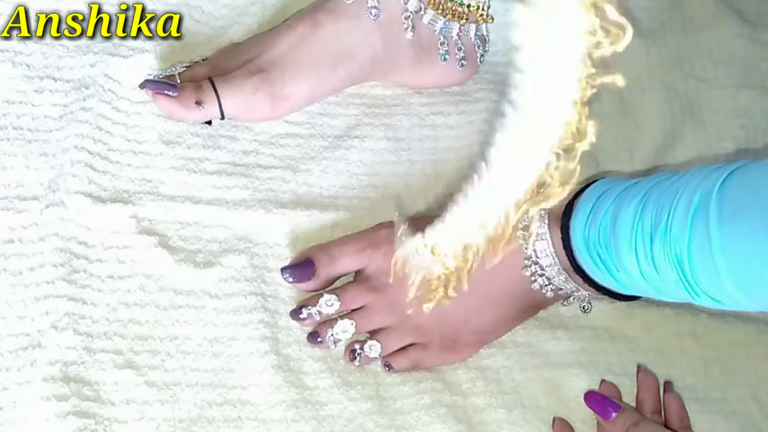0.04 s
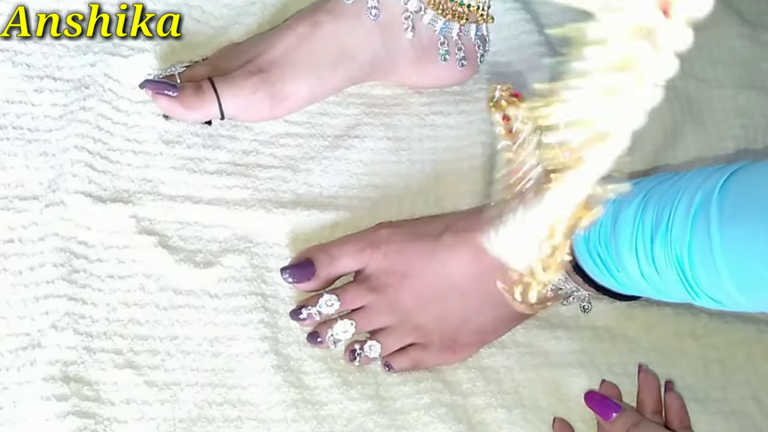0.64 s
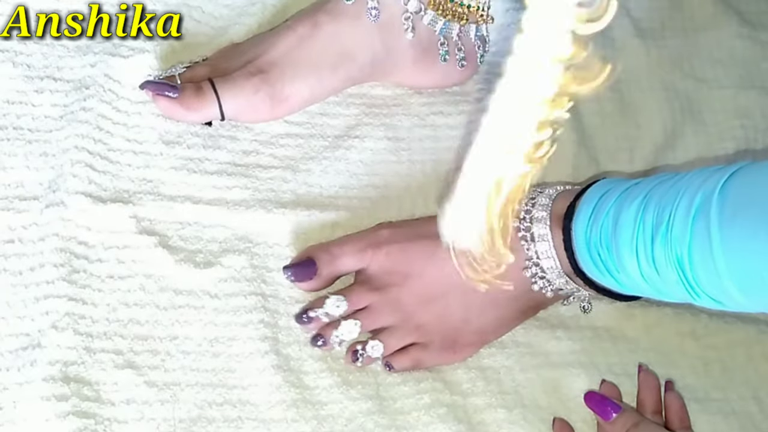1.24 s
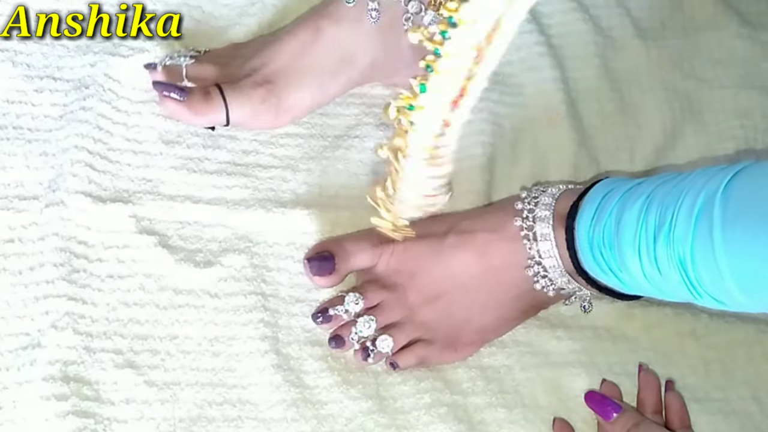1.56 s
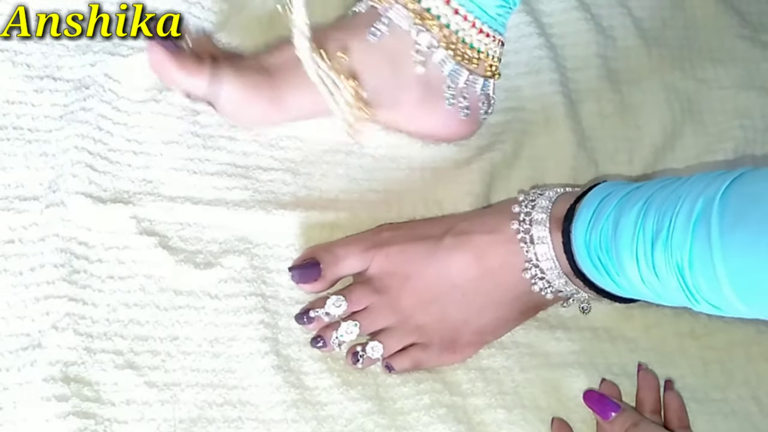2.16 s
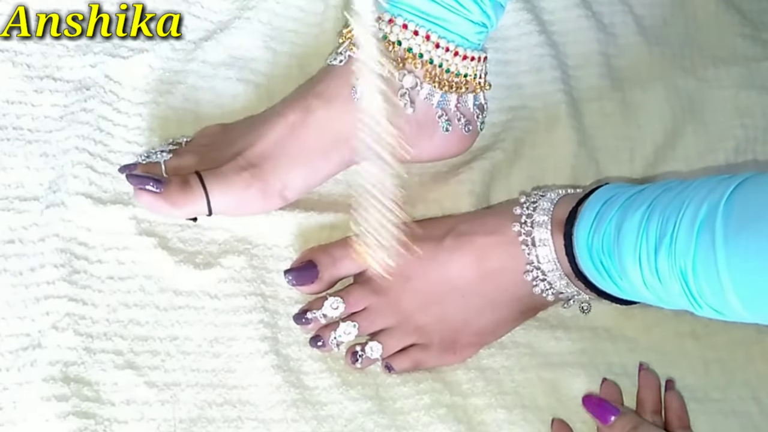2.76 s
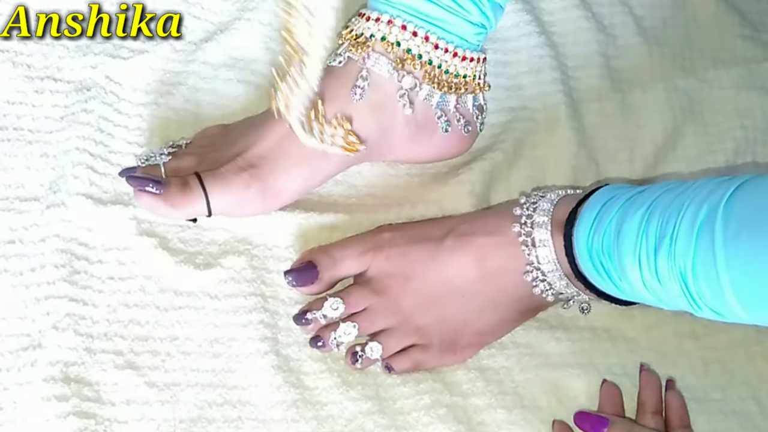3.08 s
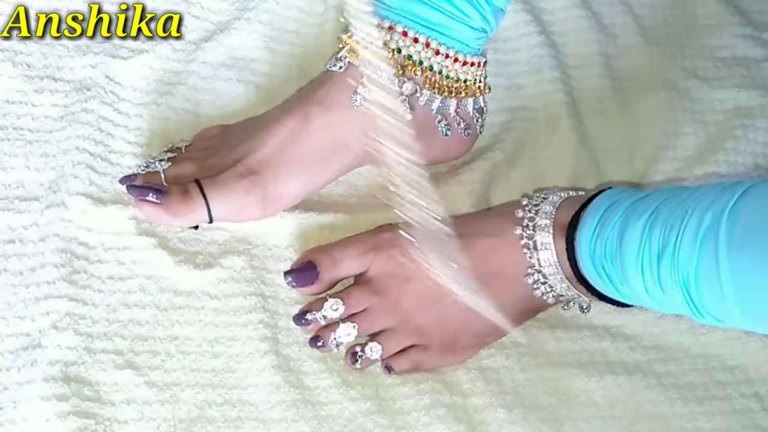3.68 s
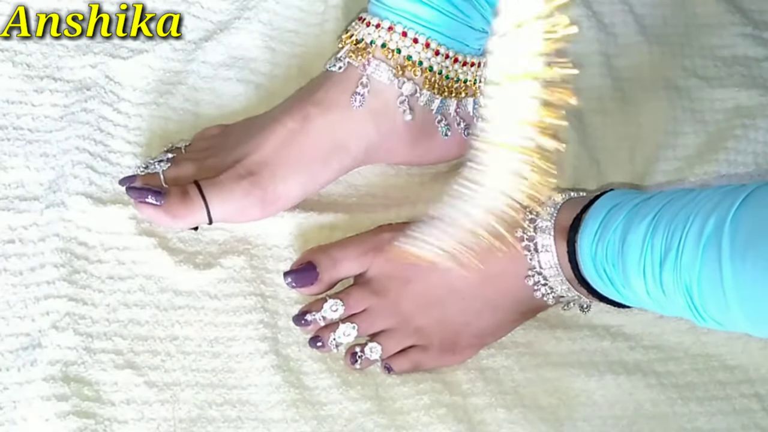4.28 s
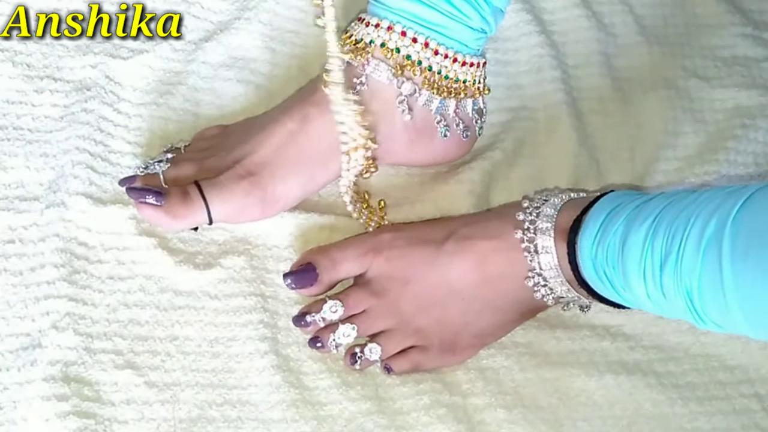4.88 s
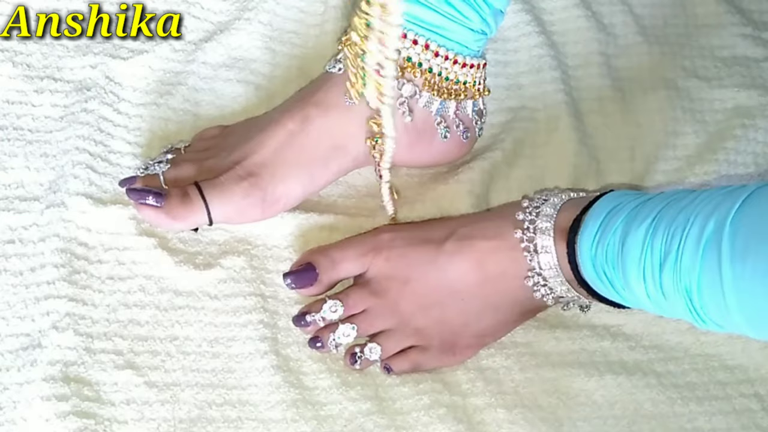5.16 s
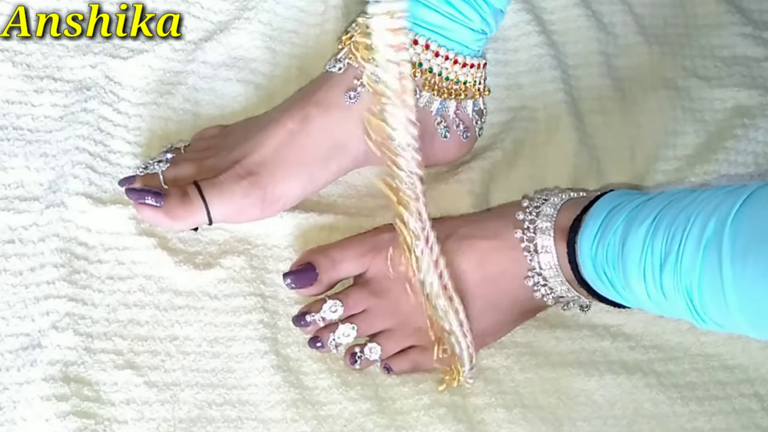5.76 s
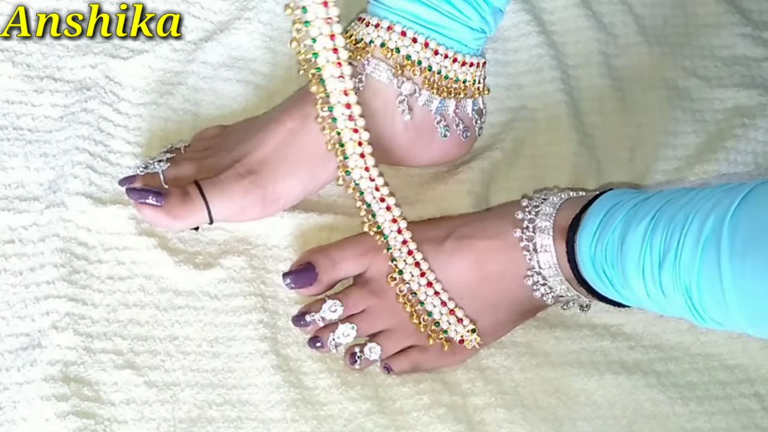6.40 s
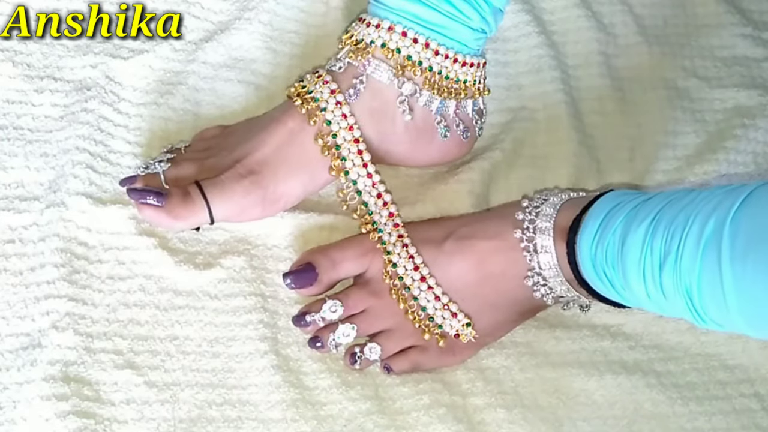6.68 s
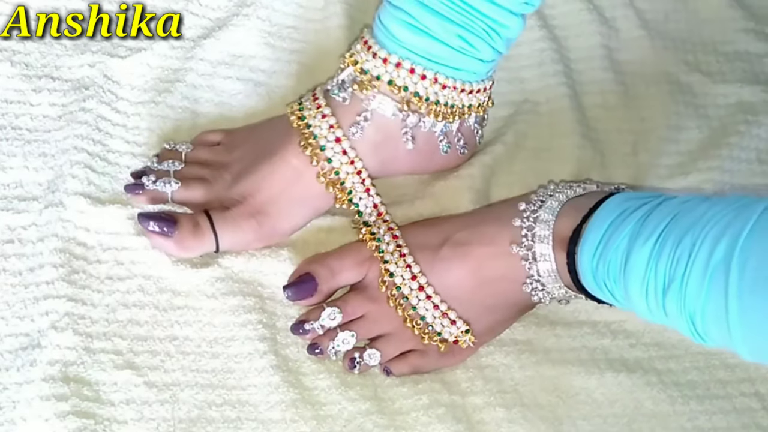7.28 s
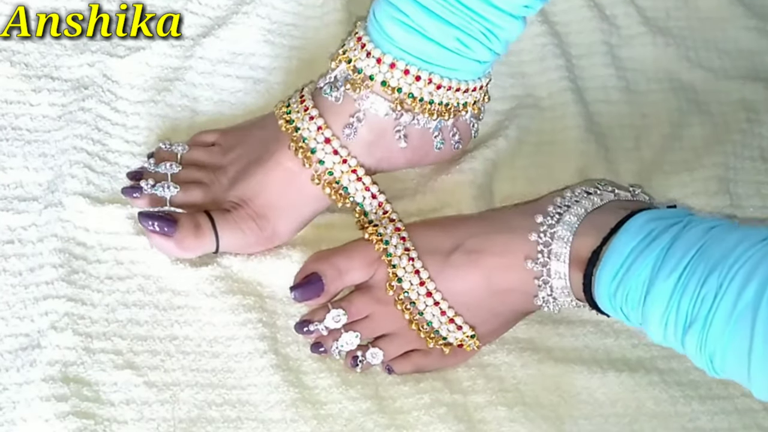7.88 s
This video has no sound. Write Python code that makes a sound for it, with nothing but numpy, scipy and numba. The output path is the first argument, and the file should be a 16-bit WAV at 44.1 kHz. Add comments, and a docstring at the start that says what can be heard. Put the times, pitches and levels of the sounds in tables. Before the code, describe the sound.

Tiny anklet bells jingle close to the microphone, lightly at first and then in stronger, irregular bursts. Chain links crunch and click within the thin, high shimmer, while the bedding gives soft, low thuds. Past the middle the shaking turns fast and regular twice, before fading to a final short jingle. A steady rush of air and a low hum fill the small bedroom throughout.

```python
"""An anklet fringed with tiny bells is swung over a bed, close to a phone in a small, humming room.
First come light shakes: the bells knock together and ring very high, and silver pendants chink faintly.
From 1.5 s the swings grow stronger, with dry clicks; chain links crunch and the bedding thuds softly.
Even shaking follows at 4.4 s and, harder, at 5.9 s. After 7 s it dies down, with a last bright clash,
as the anklet is laid across the feet. All along, the phone turns itself down when the jingling is loud."""
import sys
import numpy as np
from scipy import signal
from scipy.fft import rfft, irfft, next_fast_len
from scipy.io import wavfile
from scipy.ndimage import uniform_filter1d
from numba import njit

SR = 44100
rng = np.random.default_rng(int(sys.argv[2]) if len(sys.argv) > 2 else 0)


def unload_audio(sound):
    """Save the sound as a 16-bit wav file, at the path given as the first command line argument."""
    columns = np.transpose(np.atleast_2d(sound))
    # keep every value between -1 and 1, then stretch to whole-number steps
    steps = np.round(np.clip(columns, -1, 1) * 32767)
    wavfile.write(sys.argv[1], SR, steps.astype(np.int16))


N = 358974
TIME = np.arange(N) / SR

# the tone of metal scraping on metal: f/Hz, relative level/dB
SCRAPE_TONE = [(1500, -7), (3500, -1), (4300, 1), (4660, 7), (5100, 1), (6000, 9), (6600, 10.5), (7400, 7),
               (8500, 2.5), (10000, 4.5), (11500, 14.5), (13000, 20.5), (15500, -11)]
def jingle(bells, shake_db, count=4200, hits=3, scrape_s=0.008, scrape_db=-31, boost_db=2):
    """Bells bump at random, more often when shaken harder; each bump bounces on through a few bells."""
    scatter_db, bounce_s, rebound, lull_db = 4.4, .004, .75, -2
    busy = np.clip(undb(.35 * (shake_db + 16.5)), 0, 1)
    rings, contacts = np.zeros(N), np.zeros(N)
    chance = rng.random((count, 2 + 2 * hits))
    force = undb(scatter_db * np.clip(rng.standard_normal(count), -2, 2))
    for (when, happens, *picks), blow in zip(chance, force):
        if happens > busy[int(when * N)]:
            continue
        s = when * N / SR
        for which, gap in zip(picks[:hits], picks[hits:]):
            add(rings, s, blow * bells[int(which * len(bells))])
            # a quick bounce scrapes far harder than a slow one
            add(contacts, s, np.array([blow * (1 - gap) ** 2]))
            s += 2 * gap * bounce_s
            blow *= rebound
    # the bumps of each moment share the energy of the swing
    energy = uniform_filter1d(uniform_filter1d(rings ** 2, size=1600), size=1000)
    drive = undb(shake_db + boost_db) / np.sqrt(energy + np.mean(energy) / 1000)
    # the strap flies freely, and so more quietly, just before each clash
    flying = np.zeros(N)
    for s, _ in CLASHES:
        add(flying, s - .022, np.hanning(SR // 30))
    drive *= undb(lull_db * np.minimum(flying, 1))
    jingling = rings * drive
    # each touch leaves a scrape that fades quickly
    touch = signal.lfilter([1], [1, -np.exp(-1 / (scrape_s * SR))], contacts * drive)
    scrape = colour(touch * rng.standard_normal(N), SCRAPE_TONE)
    return jingling + undb(scrape_db) * np.std(jingling) * unit(scrape)


# how well the tiny bells give off each pitch (low ones hardly at all): f/Hz, relative level/dB
BELL_TONE = [(9000, -40), (11500, -33), (12000, -29), (12200, -25), (12350, -29), (12560, -22),
             (12900, -25), (13400, -16), (13780, -7.5), (14000, -8.5), (14400, -5.5), (14800, -3),
             (15130, 1), (15480, -3)]
def bell_knocks(count=600, twin_db=-19):
    """A set of single knocks: nearby bells soon stop the main note, while a weak twin note rings on."""
    low_hz, high_hz, crowding = 12100, 15480, 2.1
    stopped_t60, twin_t60, swell_s = .018, .06, .0006
    t = TIME[:SR // 12]
    place = (np.arange(count) + rng.random(count)) / count
    # the bells are nearly alike, so their pitches crowd at the top; the highest come first
    pitches = high_hz - (high_hz - low_hz) * place ** crowding
    # some hang more freely and ring longer
    t60s = stopped_t60 * 2 ** rng.uniform(-1.7, 1, count)
    twins = pitches + 90 * rng.uniform(-1.63, 1, count)
    knocks = [ring(hz, t60, t) + undb(twin_db) * ring(twin, twin_t60, t)
              for hz, t60, twin in zip(pitches, t60s, twins)]
    return colour(np.array(knocks) * (1 - np.exp(-t / swell_s)), BELL_TONE)


# single swings of the strap: t/s, time kept moving/s, relative level/dB
SWINGS = [(0.029, 0.0072, -30.5), (0.598, 0.0062, -19.5), (1.292, 0.013, -43), (1.505, 0.059, -25),
          (1.679, 0.094, -20.5), (1.767, 0.022, -26.5), (1.935, 0.038, -27.5), (2.066, .005, -27),
          (2.225, 0.05, -35), (2.27, 0.049, -17.5), (2.499, 0.1, -20.5), (2.738, 0.038, -18),
          (2.803, 0.19, -30), (3.185, 0.14, -19), (3.4, 0.017, -31), (3.505, 0.016, -29.5),
          (3.635, 0.074, -36), (3.733, 0.0083, -22), (3.824, 0.083, -19.5), (4.009, 0.072, -18.5),
          (4.145, 0.05, -21), (4.284, 0.036, -21), (5.089, 0.0053, -21.5), (5.188, 0.052, -23.5),
          (5.389, 0.015, -16.5), (5.53, 0.037, -21.5), (5.626, 0.18, -21), (7.722, 0.045, -27)]
# runs of even shaking: start t/s, end t/s, strokes per second/Hz, relative level/dB
SHAKES = [(0.11, .43, 10.7, -30), (0.772, .96, 11.7, -36.5), (1.027, 1.28, 12.5, -28),
          (4.376, 5.05, 10.76, -22), (5.906, 6.76, 9.93, -18), (6.837, 7.251, 14.35, -25),
          (7.27, 7.47, 13.16, -37), (7.787, 8.14, 13, -36)]
def shaking(rise_s=0.03, settle_s=0.055, stroke_s=0.03, turn_s=0.067, rest_db=-44):
    """How hard the bells move, in dB: each swing or stroke stirs them up; they are never quite still."""
    swings = [(s, hold, settle_s, db) for s, hold, db in SWINGS]
    strokes = [(s, stroke_s, turn_s, db)
               for start, end, rate, db in SHAKES for s in np.arange(start, end, 1 / rate)]
    power = np.full(N, undb(rest_db) ** 2)
    t = TIME[:SR] - 0.1  # the movement builds up ahead of its listed time
    for s, hold, settle, db in swings + strokes:
        motion = undb(db) * np.exp(np.minimum(t, 0) / rise_s - np.maximum(t - hold, 0) / settle)
        add(power, s + t[0], motion[t >= -s] ** 2)
    return 10 * np.log10(power)


# jerks of the strap that throw bells together: t/s, relative peak level/dB
CLASHES = [(0.1585, -14), (0.3396, -14), (0.4718, -15), (0.5277, -10), (0.5327, -7), (0.7492, -16),
           (0.9308, -19), (0.9996, -13), (1.0301, -13), (1.1125, -9), (1.1623, -13), (1.1982, -11),
           (1.2471, -9), (1.5319, -13), (1.6886, -5), (1.712, -7), (1.718, -5), (2.0742, -13),
           (2.2114, -13), (2.2717, -6), (2.5636, -9), (2.7252, -12), (2.7367, -9), (2.8489, -8),
           (3.1722, -9), (3.189, -8), (3.1955, -6), (3.2111, -6), (3.224, -8), (3.2889, -9), (3.3563, -8),
           (3.5618, -14), (3.8646, -6), (3.9235, -13), (4.0108, -8), (4.0746, -8), (4.2752, -10),
           (4.376, -12), (4.4558, -9), (4.6389, -10), (4.6568, -6), (4.7336, -6), (4.795, -12),
           (4.8589, -8), (4.9516, -7), (5.1003, -6), (5.1941, -9), (5.247, -11), (5.389, -11), (5.4005, -7),
           (5.44, -13), (5.5288, -12), (5.6146, -12), (5.7314, -8), (5.759, -10), (5.7648, -7), (5.909, -8),
           (5.9703, -7), (6.0077, -6), (6.0601, -10), (6.0995, -7), (6.2128, -6), (6.2537, -7),
           (6.3225, -7), (6.591, -7), (6.732, -7), (6.8179, -9), (6.8423, -10), (6.8877, -9), (6.899, -8),
           (6.978, -11), (7.0903, -13), (7.1796, -12), (7.225, -12), (7.5936, -24), (7.7154, -10),
           (7.7218, -5), (8.0935, -21)]
def clashes(bells, count=4, spread_s=0.005, scrape_db=-33, scrape_s=0.023, boost_db=1):
    """A few of the smallest bells hit almost at once, and their shells scrape as they meet."""
    out, t = np.zeros(N), TIME[:bells.shape[1]]
    for s, db in CLASHES:
        burst = np.zeros(len(t))
        for which, late in rng.random((count, 2)):
            add(burst, late * spread_s, bells[int(which * len(bells) / 2)])
        scrape = colour(rng.standard_normal(len(t)) * np.exp(-t / scrape_s), SCRAPE_TONE)
        add(out, s, undb(db + boost_db) * (unit_peak(burst) + undb(scrape_db) * unit_peak(scrape)))
    return out


def with_shimmer(knocks, bells, shimmer_db=-11, fade_s=.018):
    """The strap passes every knock on to the other bells, which answer briefly at their own pitches."""
    t = TIME[:SR // 10]
    strap = rng.standard_normal(len(t)) * np.exp(-t / fade_s)
    passed_on = signal.oaconvolve(knocks, strap / np.linalg.norm(strap))[:N]
    strength = np.sqrt(np.maximum(uniform_filter1d(passed_on ** 2, size=200), 0))
    tremble = strength * rng.standard_normal(N)
    all_bells = rng.choice([-1, 1], len(bells)) @ bells
    answer = signal.oaconvolve(tremble, all_bells)[:N]
    return knocks + undb(shimmer_db) * np.std(knocks) * unit(answer)


# clear notes from a larger bell: t/s, relative level/dB, f/Hz
PINGS = [(1.1119, -33, 12700), (1.6202, -34, 12500), (2.2144, -32, 12200), (2.79, -33, 12450),
         (2.8449, -31, 12400), (3.8048, -27, 12500), (3.8606, -25, 12600), (4.344, -31, 12700),
         (4.4149, -27, 12600), (4.5865, -24, 12600), (5.1936, -32, 12500), (5.2605, -20, 13800),
         (5.4011, -14, 13600), (6.1444, -28, 12700), (6.3555, -28, 12600), (6.5141, -30, 12700),
         (6.6448, -28, 12500), (6.7361, -30, 12500), (7.07, -37, 12250), (7.7144, -30, 12200),
         (7.869, -30, 13400)]
def pings(t60=.085, twin_gap_hz=70, twin_db=-8, swell_s=.0008, boost_db=1.5):
    """One larger bell swings clear and rings freely; its two close notes make the sound wobble."""
    out, t = np.zeros(N), TIME[:SR // 5]
    swell = 1 - np.exp(-t / swell_s)
    for s, db, hz in PINGS:
        notes = ring(hz, t60, t) + undb(twin_db) * ring(hz + twin_gap_hz, t60, t)
        add(out, s, undb(db + boost_db) * swell * notes)
    return out


# tugs on the chain: t/s, fade time/s, relative peak level/dB
CRUNCHES = [(0.521, 0.012, -32), (1.1115, 0.009, -28), (1.708, 0.01, -27), (2.2124, 0.0092, -37),
            (2.266, 0.014, -33), (2.7297, 0.016, -35), (3.155, 0.022, -28), (3.737, 0.016, -36),
            (4.0326, 0.018, -35), (4.4147, 0.008, -32), (6.27, 0.05, -36), (6.395, 0.03, -35),
            (6.55, 0.06, -37), (7.7064, 0.014, -33)]
# the tone of the links: f/Hz, relative level/dB
LINK_TONE = [(2500, -50), (4600, -14), (5500, -9.5), (6600, 1), (7500, -19), (9000, -10.5), (15500, -7)]
def links(boost_db=1):
    """The chain pulls tight and its links grind together in a quick run of tiny hits."""
    out, t = np.zeros(N), TIME[:SR // 8]
    for s, fade_s, db in CRUNCHES:
        crunch = colour(rubbing(t, fade_s), LINK_TONE)
        add(out, s, undb(db + boost_db) * unit_peak(crunch))
    return out


# short, dry clicks during loud jingling: t/s, relative peak level/dB
CLICKS = [(0.5275, -37), (1.115, -33), (1.7125, -28), (1.7205, -37), (2.2732, -29), (2.5341, -32),
          (2.5696, -32), (2.774, -39), (3.197, -38), (3.212, -37), (3.8192, -38), (3.8402, -36),
          (3.8656, -34), (4.0931, -40), (4.4149, -40), (4.4792, -37), (4.6573, -36), (4.7336, -37),
          (4.9287, -41), (4.9506, -34), (5.087, -41), (5.227, -34), (5.4018, -33), (5.5677, -36),
          (5.6146, -41), (5.7285, -39), (5.7658, -35), (5.914, -33), (6.2637, -31), (6.6687, -34),
          (6.7535, -35), (6.8423, -37), (6.927, -39)]
# the tone of a click, spread from low to high: f/Hz, relative level/dB
CLICK_TONE = [(300, -2), (1200, 0), (3200, -2), (4500, -5.5), (6500, -3.5), (8500, -3.5), (12000, -1),
              (15500, -17)]
def clicks(shake_db, stray_count=200, stray_db=-33, scatter_db=7, crackle_s=.005, boost_db=10.5):
    """Dry clicks, each with a short crackle after it; weaker stray ones follow the shaking."""
    out, t = np.zeros(N), TIME[:SR // 30]
    when = rng.integers(0, N, stray_count)
    stray_levels = shake_db[when] + stray_db + scatter_db * rng.random(stray_count)
    for s, db in [*CLICKS, *zip(TIME[when], stray_levels)]:
        crackle = .015 * rng.standard_normal(len(t)) ** 3 * np.exp(-t / crackle_s)
        click = colour((t == 0) + crackle, CLICK_TONE)
        add(out, s, undb(db + boost_db) * unit_peak(click))
    return out


# the notes a pendant rings with: f/Hz, relative level/dB, ring time/s
PENDANT_NOTES = [(3650, -7.5, .02), (4650, -7, .03), (5150, -9, .012), (5750, -1, .007), (6300, -2, .006),
                 (6780, -2, .013)]
# pendants brush each other: t/s, length/s, level/dB
CHINKS = [(0.936, 0.055, -56), (1.15, 0.08, -64), (1.435, 0.09, -56.5), (4.794, 0.07, -60),
          (7.725, 0.12, -59), (7.985, 0.07, -60)]
def pendants():
    """Larger pieces of silver rub together, ring lower than the bells and fade."""
    out, t = np.zeros(N), TIME[:SR // 2]
    body = sum(undb(db) * ring(hz, t60, t) for hz, db, t60 in PENDANT_NOTES)
    for s, length, db in CHINKS:
        chink = signal.fftconvolve(rubbing(t, length), body)[:len(t)]
        add(out, s, undb(db) * chink / np.std(chink[t < length]))
    return out


def squeak(start_s=7.402, length_s=.024, hz=2330, db=-48):
    """One faint, short squeak: a pure note that swells and fades."""
    out, t = np.zeros(N), TIME[:int(length_s * SR)]
    add(out, start_s, undb(db) * np.hanning(len(t)) * np.sin(2 * np.pi * hz * t))
    return out


# soft bumps on the bed: t/s, level/dB
BUMPS = [(0.675, -25.5), (0.765, -32), (1.85, -33), (2.367, -27), (2.512, -31), (2.65, -33), (3.001, -23),
         (3.27, -31), (3.916, -24), (3.962, -25), (4.243, -28), (4.391, -34), (4.75, -26.5), (4.919, -27),
         (5.05, -33)]
# how loudly the bedding rumbles as the legs shift: t/s, level/dB
RUMBLE_LEVEL = [(0, -47), (1, -51), (2.3, -43.5), (4.6, -53), (5.7, -53.5), (6.45, -46.5), (7.6, -56.5)]
# the tone of that rumble: f/Hz, relative level/dB
RUMBLE_TONE = [(10, -1.5), (22, 1), (50, 0.5), (80, -5.5), (130, -17.5), (250, -23.5), (600, -69)]
def bedding(push_s=0.0027, drag_db=-43, drag_s=0.05):
    """Cloth rumbles and swells around each bump; a bump pushes the bed in once and it springs back."""
    drag = sum(np.exp(-((TIME - s) / drag_s) ** 2) for s, _ in BUMPS)
    power = undb(np.interp(TIME, *np.transpose(RUMBLE_LEVEL))) ** 2 + undb(drag_db) ** 2 * drag
    out = np.sqrt(power) * unit(colour(rng.standard_normal(N), RUMBLE_TONE))
    lead_s = 0.05
    progress = (TIME[:SR // 10] - lead_s) / push_s
    thud = np.exp(-progress ** 2) - 0.4 * np.exp(-(progress / 2 - 1) ** 2)
    for s, db in BUMPS:
        add(out, s - lead_s, undb(db) * thud)
    return out


# how loud the rush of air is: t/s, level/dB
AIR_LEVEL = [(0, -46), (1.5, -47), (2.5, -47.5), (3.7, -47.5), (5.7, -48.5), (6.5, -46.5), (8.14, -48)]
# the tone of the air: f/Hz, relative level/dB
AIR_TONE = [(76, -46), (130, 2.5), (193, 0), (310, -10.5), (367, -6), (608, -5), (676, -6.5), (991, -6),
            (1280, -9), (2330, -16), (2760, -21), (5000, -30), (6500, -27), (11000, -120)]
# bands of hum and hiss in the room: f/Hz, width/Hz, relative level/dB
HUMS = [(51.5, 14.5, -57), (153, 60, -69.5), (195.6, 9.6, -64.5), (363, 15.6, -72.5), (916.7, 8.1, -64.5),
        (6640, 650, -73)]
def room_noise(hum_boost_db=2.0, hiss_db=-66, waver_db=.4):
    """A rush of air and a few hums waver slightly together, over a thin, steady hiss."""
    air_gain = undb(np.interp(TIME, *np.transpose(AIR_LEVEL)))
    air = air_gain * unit(colour(rng.standard_normal(N), AIR_TONE))
    waver = unit(uniform_filter1d(uniform_filter1d(rng.standard_normal(N), size=3000), size=2000))
    freqs, hum = np.fft.rfftfreq(N, 1 / SR), np.zeros(N)
    for hz, width, db in HUMS:
        band = rfft(rng.standard_normal(N)) / (1 + ((freqs - hz) / width) ** 4)
        hum += undb(db + hum_boost_db) * unit(irfft(band, N))
    hiss = undb(hiss_db) * rng.standard_normal(N)
    return undb(waver_db * waver) * (air + hum) + hiss


def with_walls(x, t60=0.12, echo_db=-13):
    """The bedroom walls add a short blur of echoes."""
    t = TIME[:SR // 2]
    tail = rng.standard_normal(len(t)) * np.exp(-np.log(1000) * t / t60) * (t > .005)
    return x + undb(echo_db) * signal.oaconvolve(x, tail / np.linalg.norm(tail))[:N]


def ring(hz, t60, t):
    """One struck note that fades by 60 dB in t60 seconds."""
    return np.sin(2 * np.pi * hz * t) * np.exp(-np.log(1000) * t / t60)


def rubbing(t, fade_s):
    """Tiny hits that swell and fade; cubing the noise makes it spiky."""
    return rng.standard_normal(len(t)) ** 3 * np.sqrt(t) * np.exp(-2 * t / fade_s)


def colour(x, points):
    """Give a sound the tone drawn by (f/Hz, level/dB) points."""
    hz, db = np.transpose(points)
    size = next_fast_len(x.shape[-1] + 4096)
    freqs = np.maximum(np.fft.rfftfreq(size, 1 / SR), 1)
    gains = undb(np.interp(np.log(freqs), np.log(hz), db))
    # fold the filter so that it rings only after a hit, never before
    cepstrum = irfft(np.log(gains), size)
    cepstrum[1:size // 2] *= 2
    cepstrum[size // 2 + 1:] = 0
    return irfft(rfft(x, size) * np.exp(rfft(cepstrum)), size)[..., :x.shape[-1]]


def undb(db):
    """Turn decibels into a number to multiply by."""
    return 10 ** (np.asarray(db) / 20)


def unit(x):
    """Scale to an average (rms) size of 1."""
    return x / np.sqrt(np.mean(x ** 2))


def unit_peak(x):
    """Scale so the biggest peak is 1."""
    return x / np.abs(x).max()


def add(out, s, sound):
    """Mix a sound in, starting at s seconds."""
    i = int(np.clip(s * SR, 0, len(out) - 1))
    out[i:i + len(sound)] += sound[:len(out) - i]


@njit
def follow(x, rise_s, fall_s):
    """Track a level smoothly, with one delay for rising and one for falling."""
    out, level = np.empty(len(x)), 0.
    for i in range(len(x)):
        level += (x[i] - level) / (SR * (rise_s if x[i] > level else fall_s))
        out[i] = level
    return out


def scene():
    """The anklet, the clicks and a squeak echo in the room, over the bedding and the room noise."""
    bells, shake_db = bell_knocks(), shaking()
    background = room_noise() + bedding()
    fringe = with_shimmer(jingle(bells, shake_db) + clashes(bells), bells)
    foreground = fringe + pings() + links() + clicks(shake_db) + pendants() + squeak()
    return (with_walls(foreground) + background)[None]


def record(dry):
    """The phone turns everything down just after clicks and loud jingling, and cuts the highest treble."""
    threshold_db, ratio, treble_db, top_hz = -43, 2.2, -32, 15520
    # its volume control hears middle pitches fully and the high treble only weakly
    middle = signal.sosfilt(signal.butter(8, [1700, 5500], "band", fs=SR, output="sos"), dry[0])
    heard = np.abs(middle) + undb(treble_db) * np.abs(dry[0])
    level = follow(heard, rise_s=0.00005, fall_s=0.08)
    level = follow(level, rise_s=0.009, fall_s=0.009)
    gain = np.maximum(level / undb(threshold_db), 1) ** (1 / ratio - 1)
    top_cut = signal.firwin(601, top_hz, fs=SR, window="blackman")
    return signal.oaconvolve(dry * gain, top_cut[None], mode="same")


dry = scene()
out = record(dry)
unload_audio(out)
```